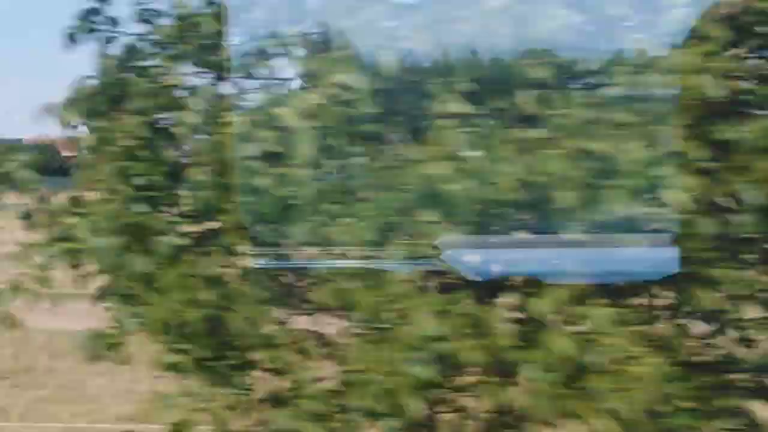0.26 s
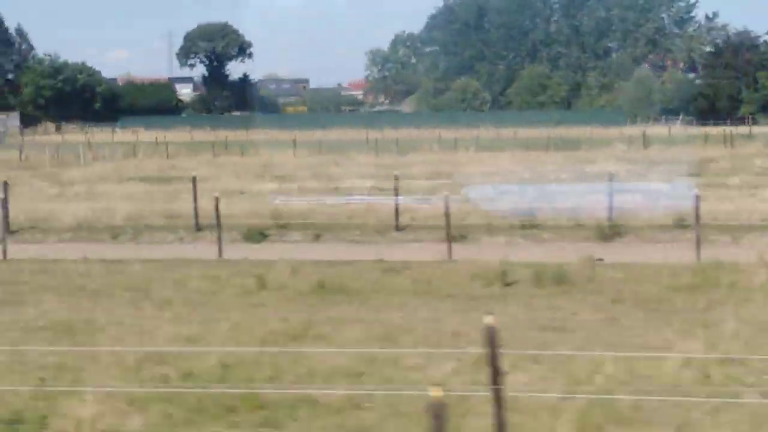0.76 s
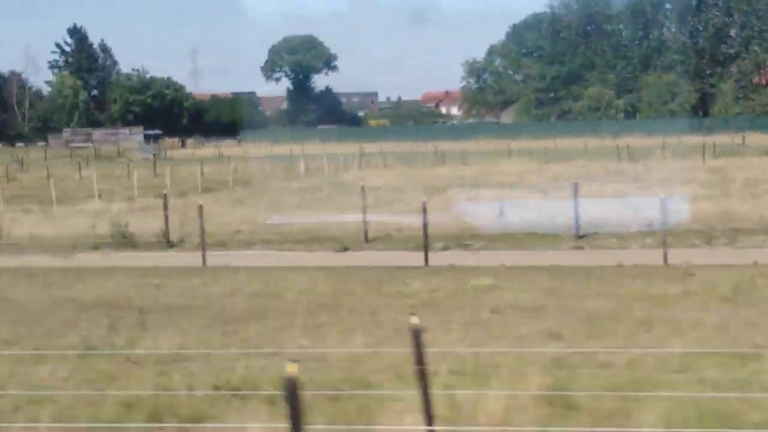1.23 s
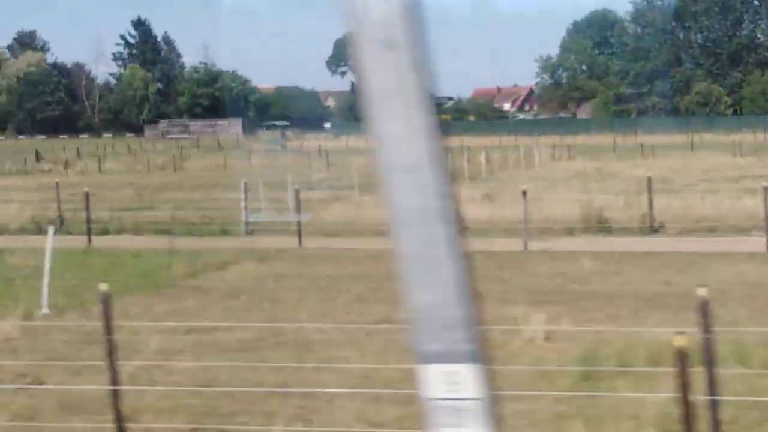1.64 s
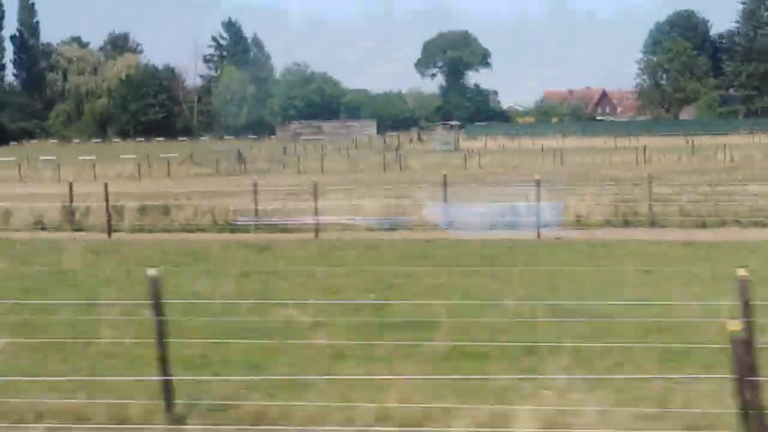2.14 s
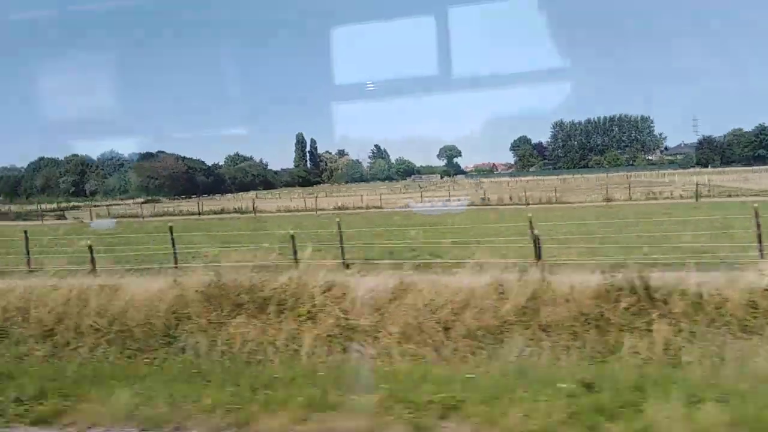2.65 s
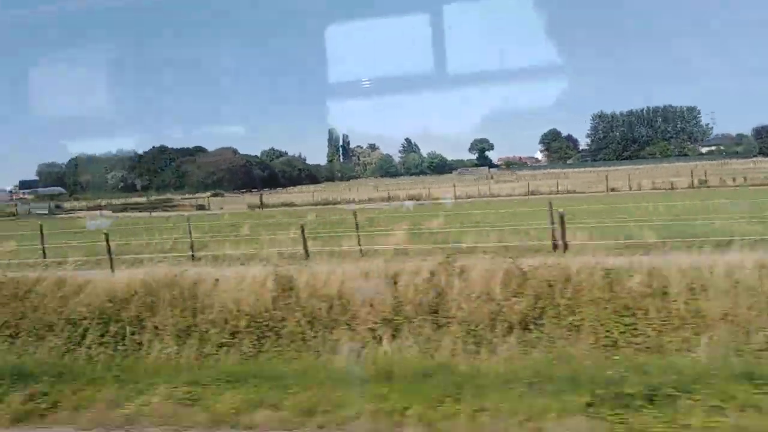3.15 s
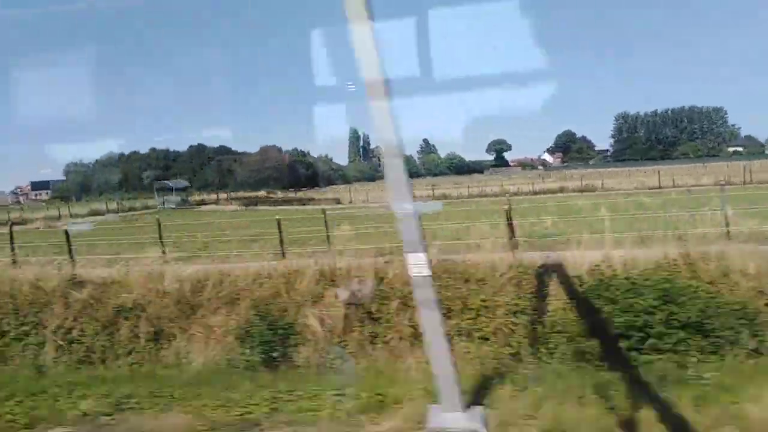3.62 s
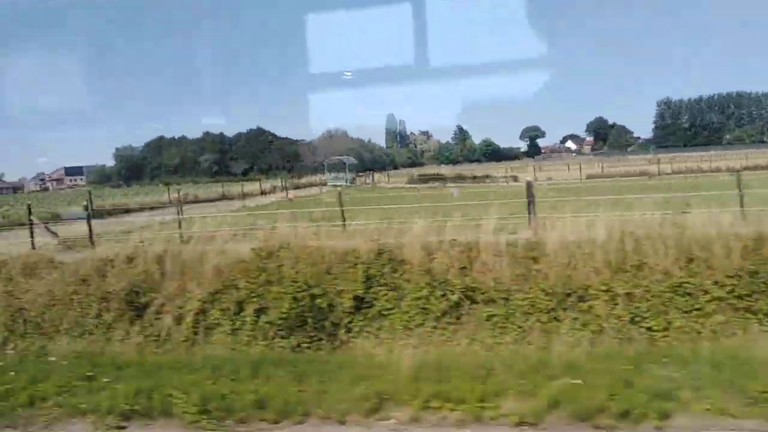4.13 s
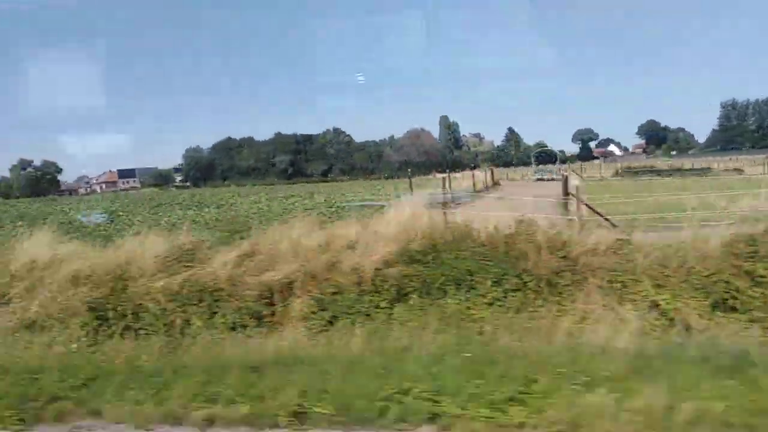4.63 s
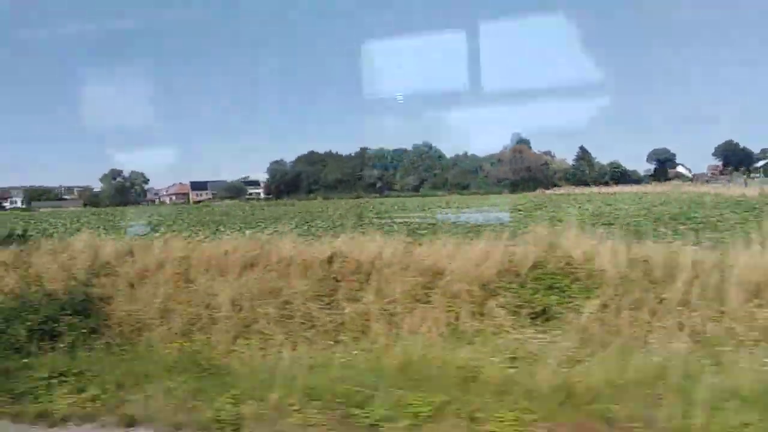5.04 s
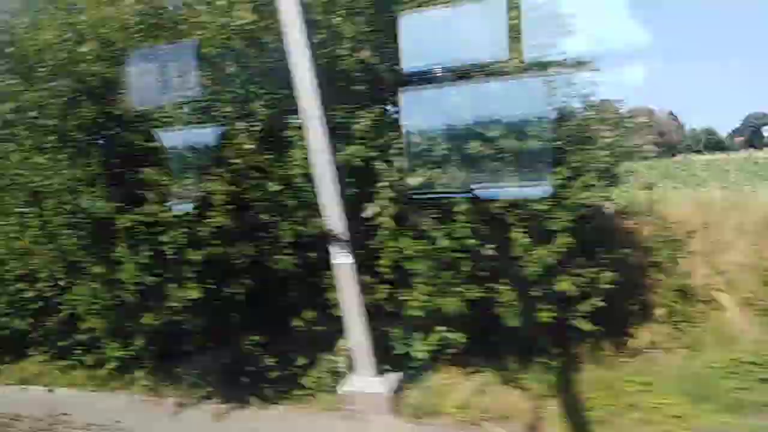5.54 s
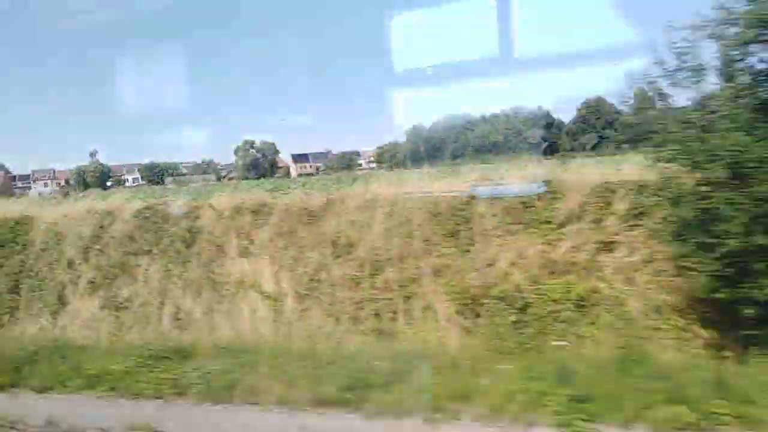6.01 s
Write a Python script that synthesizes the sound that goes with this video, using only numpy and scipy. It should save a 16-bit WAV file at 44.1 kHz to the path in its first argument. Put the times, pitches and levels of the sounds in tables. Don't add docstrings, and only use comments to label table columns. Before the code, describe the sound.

Inside a train carriage at steady speed, a low booming rumble and rolling wheel roar with faint machine whine, airy hiss and a few tiny ticks.

```python
import sys
import numpy as np
from scipy import signal
from scipy.fft import rfft, irfft
from scipy.io import wavfile
from scipy.ndimage import uniform_filter1d

SR = 44100
rng = np.random.default_rng(int(sys.argv[2]) if len(sys.argv) > 2 else 0)


def undo_db(level):
    steps = np.asarray(level, float) / 20
    return 10 ** steps


def dump_mix(stems):
    frames = np.atleast_2d(stems).T
    limited = np.clip(frames, -1, 1)
    pcm = np.round(limited * 32767).astype(np.int16)
    wavfile.write(sys.argv[1], SR, pcm)


N = 276948
T = np.arange(N) / SR
HZ = np.fft.rfftfreq(N, 1 / SR)
PORT_LAG_S = 0.00038


def colour(table, modes):
    hz, *columns = np.transpose(table)
    lift_db = sum(db / (1 + (2 * (HZ - f) / width_hz) ** 2) for f, width_hz, db in modes)
    log_hz = np.log(HZ + 1)
    base_db = [np.interp(log_hz, np.log(hz), c, left=-99, right=-99) for c in columns]
    return undo_db(np.array(base_db) + lift_db)


def walk(rate_hz):
    k = int(SR / rate_hz)
    held = np.repeat(rng.standard_normal(N // k + 1), k)
    return 1.324 * uniform_filter1d(uniform_filter1d(held, k), k)[:N]


def swells(s, size, half_s):
    return size @ np.exp(-((T - s[:, None]) / half_s[:, None]) ** 2)


def shaken(table, rest_db):
    s, db, half_s = np.transpose(table)
    return 20 * np.log10(undo_db(rest_db) + swells(s, undo_db(db), half_s))


def evened(x, window_s, share):
    envelope = np.sqrt(uniform_filter1d(np.mean(x ** 2, 0), int(window_s * SR)) + .02)
    y = x / envelope ** share
    return y / np.sqrt(np.mean(y ** 2))


def field(gain, lag_s):
    # frequency in Hz, share in 0-1.
    likeness = [(30, .97), (100, .95), (380, .92), (520, .6), (660, .8), (880, .75), (1020, .25),
                (1150, .08), (1380, .72), (1530, .3), (1620, .6), (2250, .15), (2700, .4), (3300, .1)]
    hz, common = np.transpose(likeness)
    share = np.clip(np.interp(np.log(HZ + 1), np.log(hz), common), 0, 1)
    wave, left, right = rfft(rng.standard_normal((3, N)))
    late = wave * np.exp(-2j * np.pi * HZ * lag_s)
    direct, scattered = np.array([late, wave]), np.array([left, right])
    both = irfft(gain * (np.sqrt(share) * direct + np.sqrt(1 - share) * scattered), N)
    return both / np.sqrt(np.mean(both ** 2))


def gusts():
    # centre in seconds, strength in 0-1 (about), half length in seconds.
    gust_rows = [(0.564, 0.84, .2), (1.07, 0.8, 0.066), (1.347, 0.54, 0.13), (1.737, 0.56, 0.19),
                 (2.455, 1, .17), (2.963, 0.76, 0.3), (3.377, 0.8, .2), (3.737, 0.47, .25),
                 (4.438, 1.2, 0.45), (4.805, 0.5, 0.094), (5.034, .8, 0.12), (5.25, 1, 0.1),
                 (5.643, .9, 0.23), (6.198, 0.53, 0.37)]
    return swells(*np.transpose(gust_rows))


def window_air(gust):
    # frequency in Hz, left level in dB, right level in dB.
    air_spectrum = [(3743, -24.5, -11), (4370, -15.5, -20), (5200, -22.5, -20.5), (6650, -20.5, -24),
                    (7840, -17.5, -22), (8520, -26.5, -27.5), (8700, -46.5, -33.5), (9400, -59, -42.5),
                    (11240, -55, -48), (12400, -60, -58), (14200, -65, -65)]
    # frequency in Hz, width in Hz, lift in dB (negative for a dip).
    top_modes = [(9400, 250, 9.5), (10000, 230, -9), (11200, 300, 9)]
    hiss, above = colour(air_spectrum, top_modes), HZ > 9000
    air = field(hiss * ~above, PORT_LAG_S) * undo_db(-46 + 2 * gust + 0.3 * walk(6.1))
    top = field(hiss * above, PORT_LAG_S) * undo_db(-64 + 3.5 * gust + 0.13 * walk(5))
    return air + top


def whine(hz, load, harmonics):
    load_db = np.interp(T, *np.transpose(load))
    phase = 2 * np.pi * np.cumsum(hz * (1 + .0004 * walk(6))) / SR
    out = 0
    for k, left_db, right_db, lead_rad in harmonics:
        left = undo_db(left_db + 2.6 * walk(12)) * np.sin(k * phase + .35 * walk(14))
        right = undo_db(right_db + 2.5 * walk(7)) * np.sin(k * phase + lead_rad + .6 * walk(14))
        out = out + np.array([left, right])
    return np.sqrt(2) * undo_db(load_db) * out


def ventilation_motor():
    # harmonic number, left level in dB, right level in dB, right lead in radians.
    blades = [(.5, -5.5, -1.5, .4), (1, -1, 1, 1.7), (2, -3, -8, 1.3)]
    # time in seconds, level in dB.
    fan_load = [(0, -44), (1, -44.5), (3.5, -44), (4.5, -45), (6.28, -45.5)]
    start_hz, rise_hz_per_s = 1034.9, .07
    return whine(start_hz + rise_hz_per_s * T, fan_load, blades)


def gearbox():
    # harmonic number, left level in dB, right level in dB, right lead in radians.
    mesh = [(1, 3.5, -6, 1.3)]
    # time in seconds, level in dB.
    gear_load = [(0, -43.5), (.7, -39), (1.1, -43.5), (1.45, -39.5), (1.9, -51), (2.4, -39), (3, -44.5),
                 (3.35, -40), (3.7, -47), (4.05, -39), (4.2, -35), (4.42, -40.5), (4.7, -38.5), (5.2, -40),
                 (5.9, -40.5), (6.28, -47)]
    start_hz, rise_hz_per_s = 1545.6, 1.12
    return whine(start_hz + rise_hz_per_s * T, gear_load, mesh)


def rough_rail():
    # centre in seconds, half length in seconds, frequency in Hz, width in Hz, level in dB.
    rough_stretches = [
        (4.88, .16, 750, 330, -31.5),
        (0.46, 0.29, 1670, 900, -38),
    ]
    out = 0
    for s, half_s, hz, width_hz, db in rough_stretches:
        ring = 1 / (1 + (2 * (HZ - hz) / width_hz) ** 4)
        out = out + field(ring, PORT_LAG_S) * undo_db(db) * np.exp(-((T - s) / half_s) ** 2)
    return out


def rolling(gust):
    # frequency in Hz, left level in dB, right level in dB.
    roll_spectrum = [(374, -18.5, -43), (550, -10.5, -7.5), (755, -4, -3.5), (864, 3.5, 3.5),
                     (904, -9, -0.5), (1028, 2, -0.5), (1154, -2.5, -4.0), (1496, -6.5, -6),
                     (1540, 1, -1.6), (1974, -6, -11.5), (2190, -8.5, -8.5), (2500, -10, -15),
                     (3340, -15, -16.5), (3730, -15.5, -15)]
    # frequency in Hz, width in Hz, lift in dB.
    panel_modes = [(800, 25, 3), (930, 30, 3), (1000, 30, 2), (1255, 50, 2.5), (1470, 40, 3), (1495, 14, 2),
                   (1598, 26, 4.5), (1670, 20, 2), (1760, 30, 2.5), (1835, 40, 2.5), (2187, 22, 6),
                   (2250, 40, 2), (2520, 40, 3), (3600, 120, 3)]
    roll = field(colour(roll_spectrum, panel_modes), PORT_LAG_S)
    return roll * undo_db(-30 + gust + 0.12 * walk(11))


def floor():
    # frequency in Hz, level in dB per Hz.
    boom_spectrum = [(18, -52), (28, -30), (38, -21), (50, -14), (64, 0), (90, -4.5), (120, -5.5),
                     (160, -21.5)]
    drum_spectrum = [(80, -29), (105, -6.5), (140, -3.5), (172, -12), (260, -10.5), (350, -11), (460, -17),
                     (650, -15.5), (800, -21.5), (1100, -33)]
    # frequency in Hz, width in Hz, lift in dB.
    floor_modes = [(76.3, 30, 5.5), (133, 3.7, 1.5), (148, 8.9, 1), (201.8, 14.8, 9.5), (225.2, 10.4, 4),
                   (303, 14, 1.5), (425, 24, 2.5), (658, 8.2, 3.5)]
    # centre in seconds, boom in dB, half length in seconds.
    heaves = [(.19, -34, .12), (.5, -27, 0.073), (.63, -25.5, 0.029), (.78, -46, 0.071), (.92, -27.5, .04),
              (1.05, -28, .03), (1.4, -38, 0.13), (1.56, -26, 0.017), (1.77, -33, .08),
              (1.91, -27.5, 0.035), (2.16, -39, 0.055), (2.36, -31.5, 0.079), (2.55, -29, 0.074),
              (2.7, -29, 0.037), (2.94, -29, 0.038), (3.05, -25, 0.024), (3.17, -26, .04),
              (3.28, -34, 0.083), (3.55, -34, 0.12), (3.68, -38, 0.045), (4.05, -26.5, 0.061),
              (4.24, -25.5, 0.052), (4.42, -34, .05), (4.62, -33, 0.076), (5.05, -34, 0.18),
              (5.18, -45, .04), (5.59, -26.5, 0.072), (5.79, -42, 0.022), (6.1, -29, 0.058),
              (6.23, -33, .035)]
    # centre in seconds, drumming in dB, half length in seconds.
    welds = [(.2, -38.5, .07), (.56, -44, 0.029), (.67, -33, 0.075), (.92, -40, 0.044),
             (1.05, -30.5, 0.023), (1.55, -39.5, 0.22), (1.77, -46, 0.097), (2.18, -31.5, 0.083),
             (2.45, -39.5, 0.27), (2.76, -29, 0.04), (3.0, -49, .05), (3.36, -44, .06),
             (3.63, -34.5, 0.067), (3.88, -40, 0.18), (4.24, -41, 0.034), (4.45, -41, 0.18),
             (4.88, -45, .1), (5.15, -39, 0.082), (5.5, -36, 0.082), (5.72, -40, 0.058),
             (5.88, -33.5, 0.025), (6.2, -35, 0.024)]
    boom_db, drum_db = shaken(heaves, -30.5), shaken(welds, -32)
    lean = undo_db(np.array([[-.4], [.4]]))
    boom = evened(field(colour(boom_spectrum, floor_modes) * lean, 0), 0.059, 0.71) * undo_db(boom_db)

    drum_gain = colour(drum_spectrum, floor_modes) * lean
    high = np.clip((HZ - 240) / 60, 0, 1)
    low_gain, high_gain = drum_gain * (1 - high), drum_gain * high
    drum = evened(field(low_gain, 0), 0.11, 0.31) * undo_db(drum_db + 0.9)

    scale = np.sqrt(np.sum(high_gain ** 2) / np.sum(low_gain ** 2))
    mean_db = np.mean(drum_db)
    upper = field(high_gain * undo_db(np.array([[-.6], [.6]])), 0) * scale
    upper = upper * undo_db(mean_db + 0.093 * (drum_db - mean_db) + 0.52 * walk(3.67))
    return boom + drum + upper


def finger():
    # time in seconds, peak in dB (before a 4 dB lift), half of left minus right in dB, ring in Hz,
    # decay in seconds.
    ticks = [
        (1.2905, -35, -6, 9000, 0.0028),
        (1.297, -33, -5, 11000, .004),
        (1.4714, -45, 0, 25000, .02),
        (3.3707, -32, 3, 11000, 0.0022),
        (3.3804, -42, 11, 6000, .003),
        (3.5498, -40, 9, 7000, .002),
    ]
    out, t = np.zeros((2, N)), np.arange(int(.15 * SR)) / SR
    bursts = rng.standard_normal((len(ticks), 2, len(t)))
    for (s, db, pan_db, ring_hz, decay_s), noise in zip(ticks, bursts):
        rustle = undo_db(-25 + 0.5 * pan_db) * np.exp(-t / .07)
        shape = np.exp(-6.9 * t / decay_s) + rustle
        band_hz = np.clip([ring_hz * .5, ring_hz * 0.99], 500, 16000)
        tick = signal.sosfilt(signal.butter(2, band_hz, "band", fs=SR, output="sos"), noise * shape)
        tick = tick / np.abs(tick).max(1, keepdims=True)
        i = int((s + .001) * SR)
        out[:, i:i + len(t)] += tick * undo_db(db + 4.0 + np.array([[pan_db], [-pan_db]]))
    return out


def scene():
    gust = gusts()
    machines = ventilation_motor() + gearbox()
    return window_air(gust) + machines + rough_rail() + rolling(gust) + floor() + finger()


def thinned(x):
    # from Hz, to Hz, patch width in bins, patch length in frames, memory in frames,
    # threshold in dB.
    thin_bands = [
        (4500, 6800, 3, 6, 60, -.45),
        (8700, 14500, 5, 12, 50, 1.5),
    ]
    hz, _, cells = signal.stft(x, SR, nperseg=1024)
    power, gain = np.mean(np.abs(cells) ** 2, 0), 1
    for low_hz, high_hz, bins, frames, memory, under_db in thin_bands:
        usual = np.exp(uniform_filter1d(np.log(power + 1e-18), size=memory, axis=1))
        patch = uniform_filter1d(power / usual, size=bins, axis=0)
        patch = uniform_filter1d(patch, size=frames, axis=1)
        inside = ((hz > low_hz) & (hz < high_hz))[:, None]
        weak = (patch < undo_db(2 * under_db)) & inside
        gain = gain * np.where(weak, undo_db(-18), 1)
    return signal.istft(cells * gain, SR, nperseg=1024)[1][:, :N]


def low_pass(x):
    return signal.sosfilt(signal.butter(12, 14250, fs=SR, output="sos"), x)


def record(dry):
    mix = thinned(dry)
    return low_pass(mix)


dry = scene()
out = record(dry)
dump_mix(out)
```